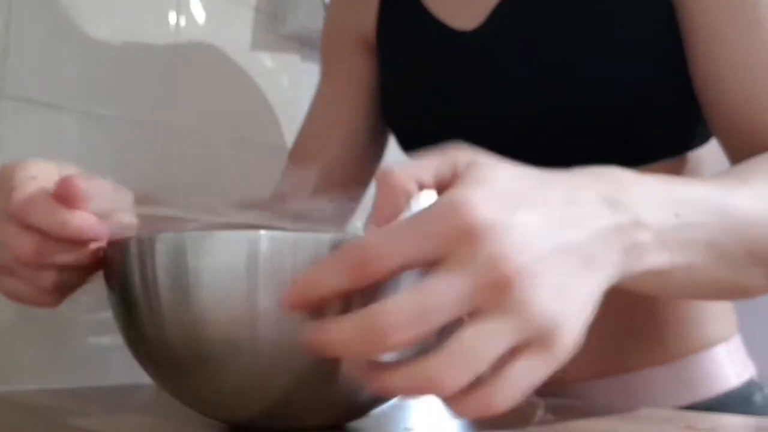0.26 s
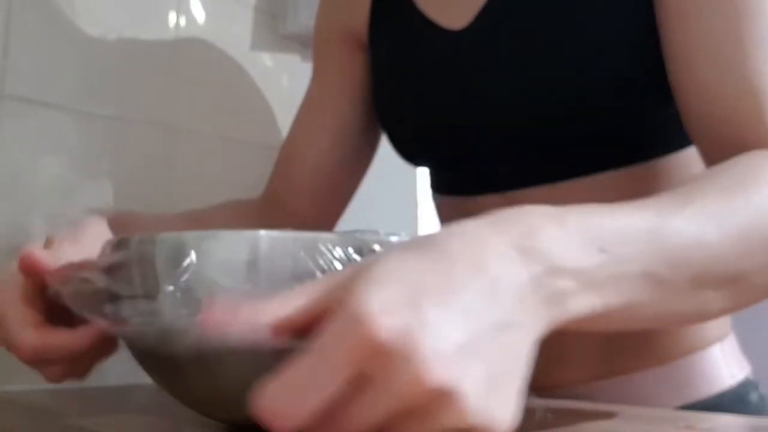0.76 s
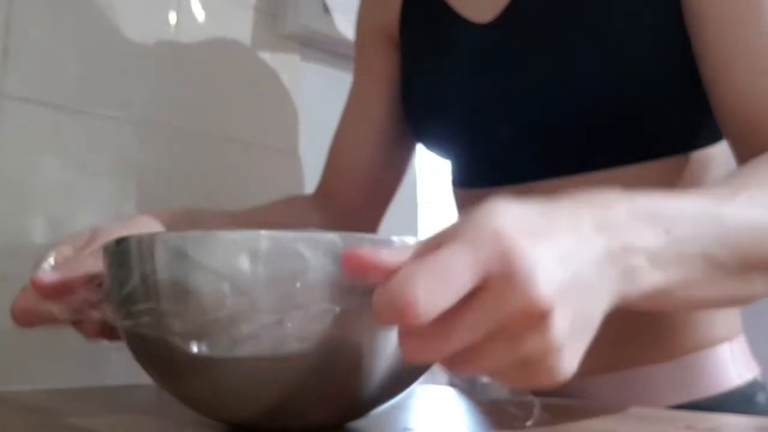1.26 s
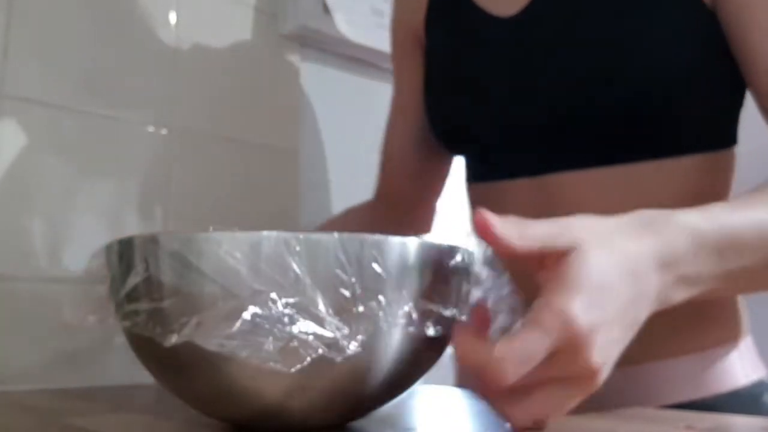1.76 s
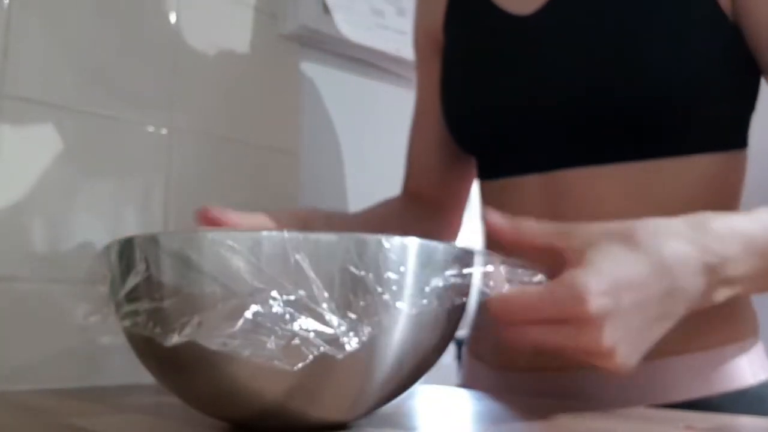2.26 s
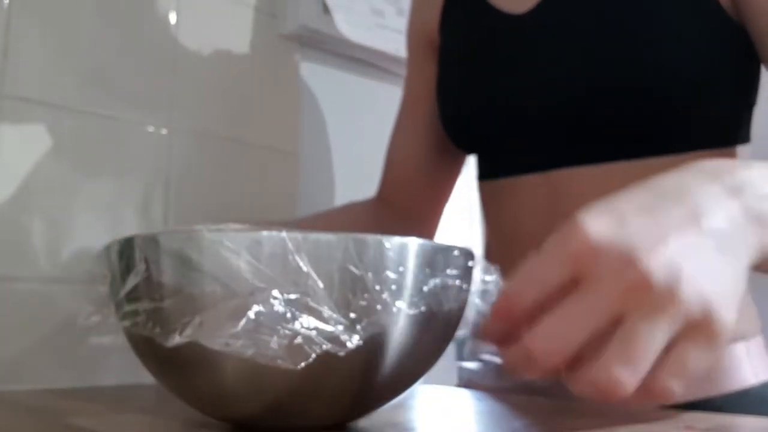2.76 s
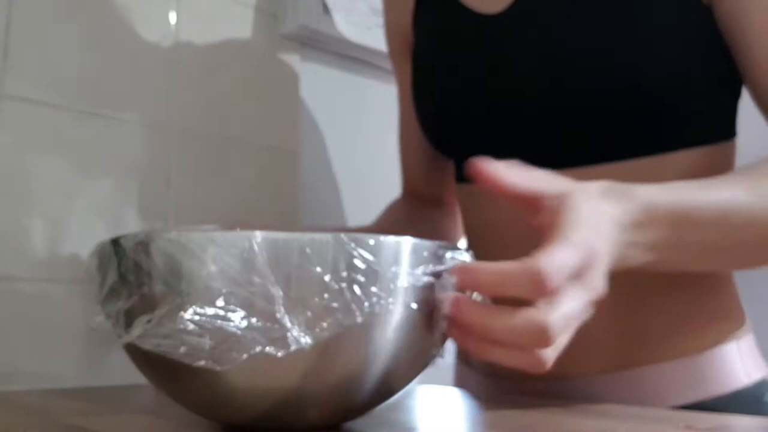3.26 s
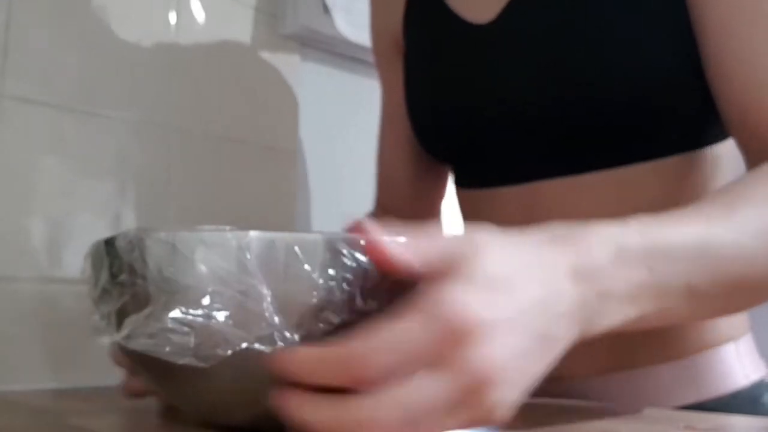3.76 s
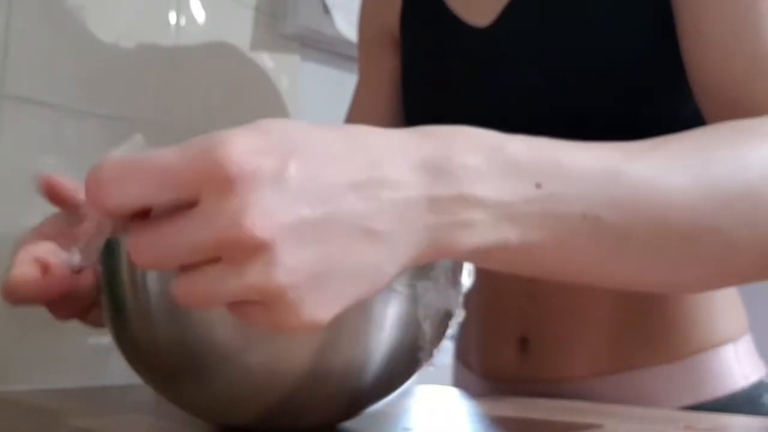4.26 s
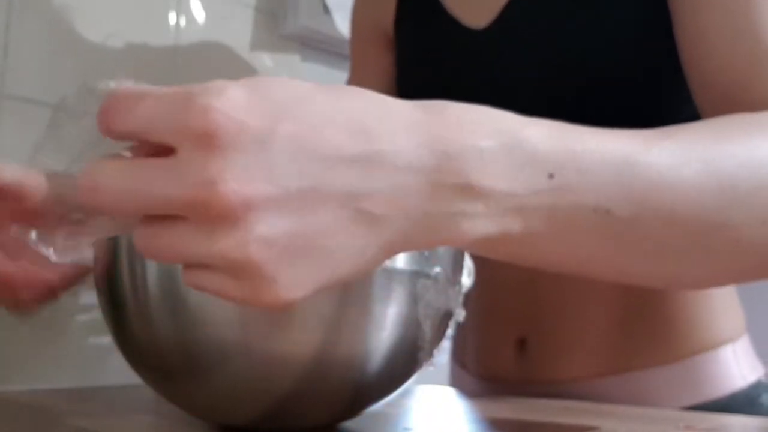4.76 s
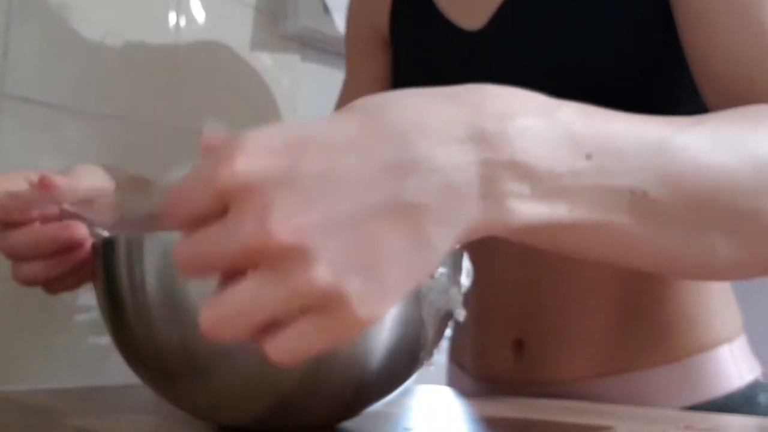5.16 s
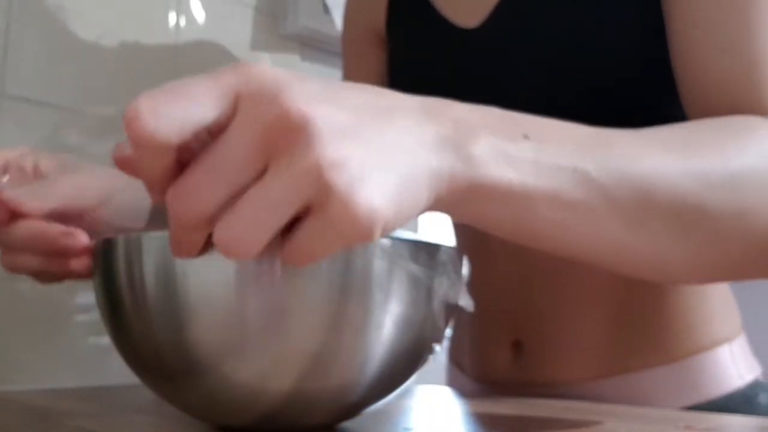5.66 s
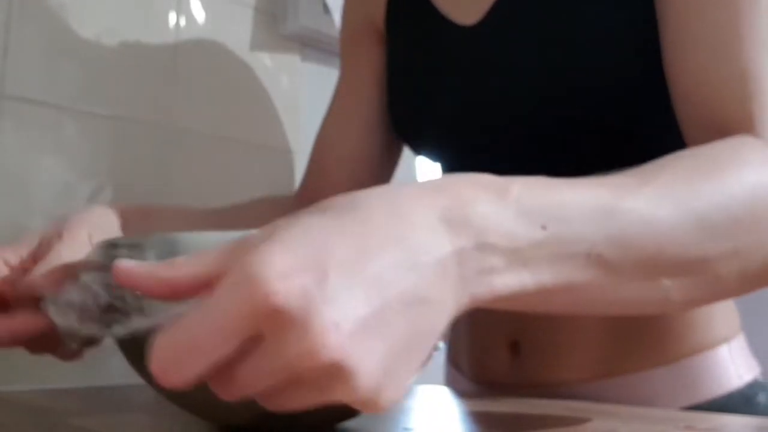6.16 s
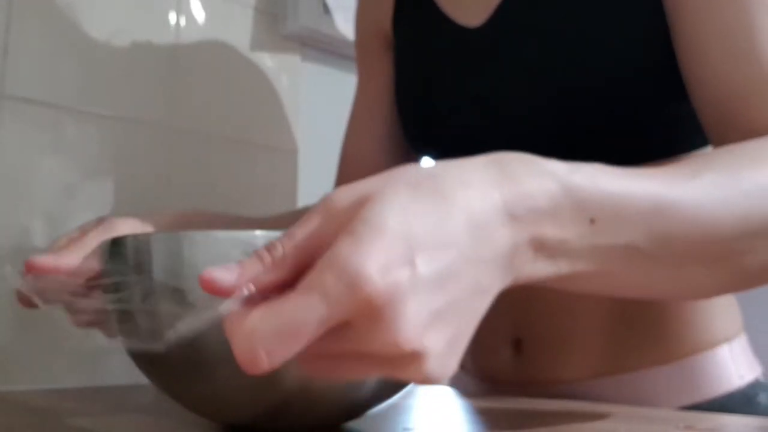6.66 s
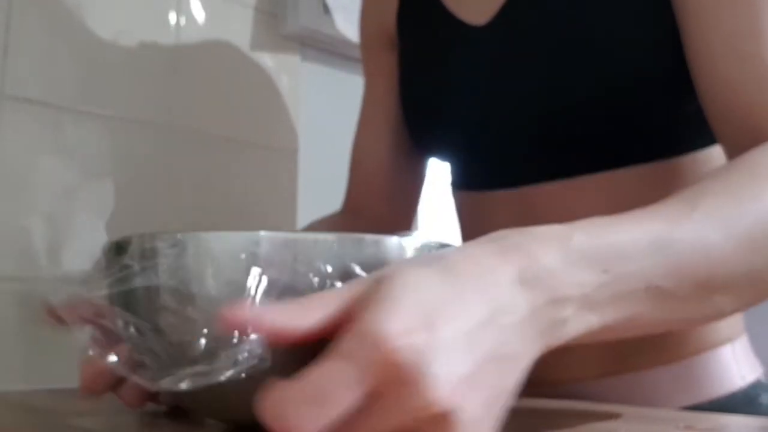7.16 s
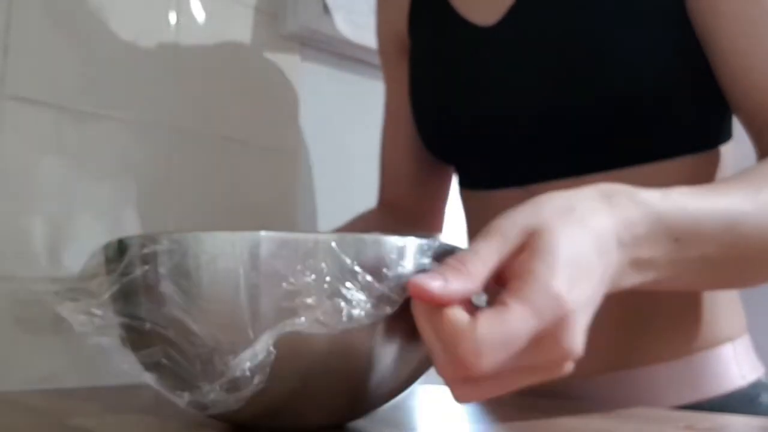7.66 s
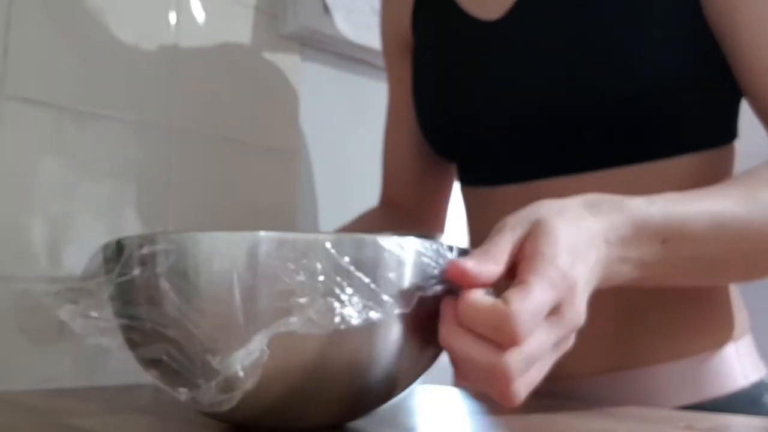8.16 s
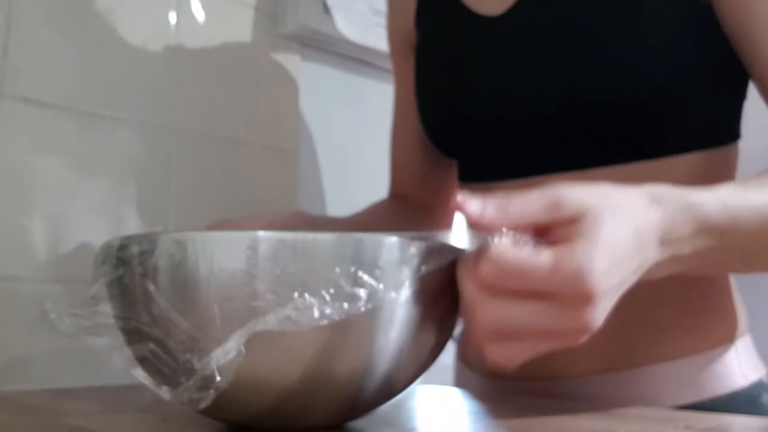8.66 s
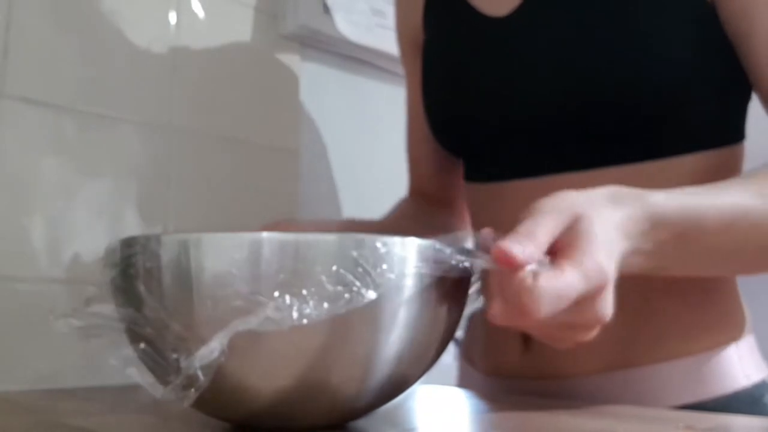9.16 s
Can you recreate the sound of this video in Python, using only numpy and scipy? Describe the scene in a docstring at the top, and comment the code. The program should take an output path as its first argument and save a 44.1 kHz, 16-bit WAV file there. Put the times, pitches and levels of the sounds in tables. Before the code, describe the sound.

Thin plastic wrap crinkles, snaps and rubs taut around a steel bowl that scrapes and bumps, twice banging hard on a kitchen counter.

```python
"""A brief crinkle with a snap in it comes first: cling film pulled over a steel bowl on a kitchen counter.
The film rustles as many tiny buckling clicks, filtered by its facets; its snaps are flurries of slips.
The hands jog and shove the bowl: decaying modes and friction noise give thuds, slides and judder.
Twice it knocks hard on the counter, the second time as a close double blow.
Two nearby microphone ports pick it all up, with the short diffuse tail of a small tiled room."""
import sys
import numpy as np
from scipy import signal
from scipy.fft import rfft, irfft, next_fast_len
from scipy.io import wavfile
from scipy.ndimage import uniform_filter1d

SR = 44100
rng = np.random.default_rng(int(sys.argv[2]) if len(sys.argv) > 2 else 0)


def store_pcm(level_fs):
    """Save levels as 16-bit WAV."""
    pcm = np.round(np.clip(level_fs, -1, 1) * 32767).astype(np.int16)
    wavfile.write(sys.argv[1], SR, np.atleast_2d(pcm).T)


N = 415422

# the bowl is jogged or set down: t/s, level/dB, hardness as spectral tilt/(dB per octave), skid decay/s
BLOWS = [(0.595, -29.5, -8.5, .03), (0.964, -21, -2, .046), (1.558, -15.5, 0.5, 0.014),
         (1.784, -28, -6, 0.014), (1.819, -22, 3, 0.022), (2.976, -37, -8, .02), (3.106, -37, -2, 0.018),
         (3.701, -25.5, -5, 0.08), (3.7891, -1.9, 2.5, 0.012), (4.351, -29, 9, 0.012),
         (4.774, -37, 9.5, .01), (5.131, -25, -3.5, 0.13), (5.646, -25.5, 9, 0.015),
         (5.702, -21, -1.5, 0.072), (6.4471, -2, 2.5, 0.016), (6.4663, -5, 1.5, 0.012),
         (6.794, -33, -0.5, .014), (7.142, -20.5, -2, 0.091), (7.187, -23, -3.5, 0.2),
         (7.7, -38, -4.5, .03), (8.039, -31.5, -9.5, 0.043), (8.121, -42, -5, 0.033),
         (8.204, -31.5, -8.5, 0.07), (8.418, -26, 0.5, .038), (8.834, -25, -3.5, 0.014),
         (9.256, -28.5, -1.5, .017), (9.351, -36, -2, .022)]
# spectral shape of the base skidding on the counter: f/Hz, relative level/dB
SKID_SHAPE = [(35, -53.5), (70, 0), (110, 1.5), (160, -12), (232, -1), (310, -9), (420, -0.5), (520, -14.5),
              (900, -35.5), (1200, -31.5), (2200, -31), (5000, -52.5), (15000, -64)]
# spectral shape of the crinkling film: f/Hz, relative level/dB
CRINKLE_SHAPE = [(300, -40), (1500, -10), (2600, -1.5), (3700, .5), (5000, -3.5), (6500, -5), (8500, -2),
                 (11500, 0), (14300, -2), (16000, -10)]


def amp(db):
    """Level to amplitude: 20 dB is a factor of ten."""
    return 10 ** (np.asarray(db) / 20)


def unit(x):
    """Normalization: the signal is scaled to an rms of one."""
    return x / np.sqrt(np.mean(x ** 2) + 1e-20)


def read(points, hz):
    """Interpolation of a table that is linear in log frequency."""
    f, value = np.transpose(points)
    return np.interp(np.log(hz + 1), np.log(f), value)


def add(mix, s, sound):
    """Superposition: a sound is added to the mix in place from time s."""
    part = mix[..., max(round(s * SR), 0):][..., :sound.shape[-1]]
    part += sound[..., :part.shape[-1]]


def convolve(x, response):
    """Linear filtering by convolution, cut to the length of x."""
    return signal.oaconvolve(np.atleast_2d(x), np.atleast_2d(response), axes=1)[:, :x.shape[-1]]


def causal(gain_db):
    """Minimum phase: the Hilbert transform of log gain (over the whole circle) gives the quickest response."""
    log_gain = np.log(amp(gain_db))
    spectrum = np.exp(np.conj(signal.hilbert(log_gain)))
    return np.fft.ifft(spectrum).real[:len(log_gain) // 2]


def colour(x, points, size=4096):
    """Spectral shaping by a filter of unit energy, which keeps the power of white noise."""
    response = causal(read(points, abs(np.fft.fftfreq(size, 1 / SR))))
    return convolve(x, response / np.linalg.norm(response))


def wander(rate_hz):
    """Slow random modulation: straight lines join normal random knots of unit variance."""
    knots = rng.standard_normal(N // 16)
    return np.interp(np.arange(N) * rate_hz / SR, np.arange(len(knots)), knots)


def room_tone():
    """Stationary background noise: independent shaped noise at the two ports."""
    # spectral shape of the quiet kitchen: f/Hz, relative level/dB
    tone_shape = [(20, -22.5), (50, 4), (95, 1), (150, -6), (400, -53.5), (1000, -18), (3000, -55),
                  (8000, -20), (15000, -33)]
    return amp(-54) * colour(rng.standard_normal((2, N)), tone_shape)


def kitchen(x):
    """Diffuse reverberation: noise taps decay exponentially, each band with its own T60."""
    # reverberation time of the room: f/Hz, T60/s
    decay_times = [(100, 0.26), (400, 0.36), (1500, 0.44), (5000, 0.34), (14000, 0.55)]
    after_gap = np.arange(SR // 2) > .008 * SR  # the tail starts after 8 ms
    taps = rng.standard_normal((2, SR // 2)) * after_gap
    hz, t, z = signal.stft(taps, SR, nperseg=256)
    decay = amp(-60 * t / read(decay_times, hz)[:, None])
    tail = signal.istft(z * decay, SR, nperseg=256)[1]
    return convolve(x, tail / np.linalg.norm(tail[0]))


def ports(film, mono_hz=380):
    """Spatial coherence: at long wavelengths both ports receive nearly the same pressure."""
    length = next_fast_len(N, real=True)
    hz = np.fft.rfftfreq(length, 1 / SR) + 1
    apart = np.pi / 4 / (1 + (mono_hz / hz) ** 2)  # angle between mid only (0) and full stereo
    left, right = rfft(film, length)
    mid = (left + right) * np.cos(apart)
    side = (left - right) * np.sin(apart)
    return irfft([mid + side, mid - side], length)[:, :N] / np.sqrt(2)


def shade(x, size=2048):
    """Interaural-style level difference: opposite half-balance filters colour the two ports."""
    # balance of the ports: f/Hz, left minus right level/dB
    port_balance = [(100, 0), (400, -3), (700, -9), (1200, -2), (2400, -2.5), (4200, 0), (6000, 4),
                    (8200, -.5), (11000, -5), (14500, -2)]
    balance_db = read(port_balance, abs(np.fft.fftfreq(size, 1 / SR))) / 2
    return convolve(x, [causal(balance_db), causal(-balance_db)])


def scatter(near_s, near_db, far_s, far_db, delay=22):
    """Multipath propagation: direct sound, later on the left, then reflections off nearby things and tiles."""
    t = np.arange(SR // 16) / SR
    paths = np.zeros((2, len(t)))
    paths[0, delay] = paths[1, 0] = 1  # delay in samples
    # near: bowl, hands and counter; far: wall tiles
    for decay_s, db in ((near_s, near_db), (far_s, far_db)):
        taps = rng.standard_normal(paths.shape) * np.exp(-t / decay_s)
        paths += amp(db) * taps / np.linalg.norm(taps, axis=1, keepdims=True)
    return paths / np.linalg.norm(paths[0])


def bowl_shuffle(dull_db=-4.5):
    """Sliding friction as noise: taut film drags the bowl in small jerks, and each knock lets it slide on."""
    drag_db = -7  # against the rub of the taut film
    settle_db, settle_per_knock, settle_s = -28, 0.59, 0.08  # level dB, dB per dB of knock, decay s
    t = np.arange(SR // 2) / SR
    power = amp(pull()[1] + drag_db) ** 2
    for s, level_db, _, _ in BLOWS:
        slide = amp(settle_db + settle_per_knock * level_db) * np.exp(-t / settle_s)
        add(power, s, slide ** 2)
    jerks_db = 3 * wander(rate_hz=30)
    drag = rng.standard_normal(N) * np.sqrt(power) * amp(jerks_db)
    # dull_db tilts the shape, per octave from 240 Hz
    dull_shape = [(hz, db + dull_db * np.log2(hz / 240)) for hz, db in SKID_SHAPE]
    return amp(-2.0) * colour(drag, dull_shape)


def judder(rise_s=0.0042):
    """Stick-slip friction, modelled as noise in narrow resonators, sounds as the bowl is shoved."""
    # shoves along the counter: t/s, level/dB, decay/s
    shoves = [(0.785, -38.5, 0.057), (0.965, -23, 0.055), (1.067, -32.5, 0.07), (5.135, -44.5, 0.095),
              (7.245, -41, 0.075)]
    # low resonances of the juddering bowl: f/Hz, bandwidth/Hz, relative level/dB
    resonances = [(128.4, 6.2, 3), (183.7, 7.7, 0.5), (220, 14, -7.5), (277.5, 12, -6.5), (376, 23, -4),
                  (466, 39, -15)]
    out, t = np.zeros(N), np.arange(SR // 2) / SR
    for s, level_db, decay_s in shoves:
        envelope = (1 - np.exp(-t / rise_s)) * np.exp(-t / decay_s)
        slide = 0
        for hz, width, db in resonances:
            b, a = signal.iirpeak(hz, hz / width, fs=SR)
            ring = signal.lfilter(b, a, rng.standard_normal(SR))[-len(t):]  # past the filter's onset
            slide = slide + amp(db) * unit(ring * envelope)
        envelope_rms = np.sqrt(np.mean(envelope ** 2)) / envelope.max()
        add(out, s, amp(level_db) * unit(slide) * envelope_rms)
    return out


def knocks(rise_s=0.0027, soft_db=-1.5, detune=0.0083, ring_db=-5.5, skid_db=-17):
    """Impact excitation of modes, with a skid of the base: a softer blow rises slowly and stays low."""
    # modes of bowl and counter together: f/Hz, relative level/dB, T60/s
    counter_modes = [(84.4, -15, 0.5), (107.4, -1.5, 0.3), (215.6, -5.5, 0.17), (205, -2, 0.04),
                     (241.4, 3.5, 0.12), (268, -15, 0.27), (367.8, -2, 0.13), (411.8, -4.5, 0.15),
                     (441, -2.5, 0.12), (606.5, -18.5, 0.13), (698, -17.5, 0.16), (859, -16.5, 0.12),
                     (871, -24.5, 0.12), (1063, -22, 0.11), (1250, -36, 0.052), (1660, -27.5, 0.13),
                     (1860, -27, 0.044), (2280, -45.5, .06)]
    out, t = np.zeros(N), np.arange(SR // 3) / SR
    hz, db, t60 = np.transpose(counter_modes)[:, :, None]
    skid_hz, skid_level = np.transpose(SKID_SHAPE)
    modes = amp(db - 60 * t / t60)
    for s, level_db, tilt_db, skid_s in BLOWS:
        pitch = hz * (1 + detune * rng.standard_normal(hz.shape))  # the grip shifts the modes
        tilt = amp(tilt_db * np.log2(hz / 240))
        ring = (tilt * modes * np.cos(np.float32(2 * np.pi * pitch * t))).sum(0)
        tilted = skid_level + tilt_db * np.log2(np.maximum(skid_hz, 90) / 240)
        noise = colour(rng.standard_normal(SR // 2), np.transpose([skid_hz, tilted]))
        skid = unit(noise[0, -len(t):]) * np.exp(-t / skid_s)
        ring_rms = np.sqrt(np.mean(ring[:SR // 50] ** 2))  # over the first 20 ms
        blow = amp(ring_db) * ring / ring_rms + amp(skid_db) * skid
        rise = 1 - np.exp(-t / (rise_s * amp(soft_db * tilt_db)))
        add(out, s, amp(level_db) * blow * rise)
    return out


def bowl_ring(film):
    """Forced vibration: film sound convolved with damped modes sets the steel wall ringing."""
    # wall modes, damped by hand and film: f/Hz, relative level/dB, T60/s
    wall_modes = [(880, -3, .06), (1565, -3, .09), (1935, -3, .1), (2190, -5, .22), (2645, -8, .14),
                  (2863, -5, .18), (3168, -4, .18), (3459, -3, .2), (4460, -10, .08)]
    t = np.arange(SR // 3) / SR
    ring = 0
    for hz, db, t60 in wall_modes:
        phase = rng.random((2, 1))  # in cycles, one for each port
        ring = ring + amp(db - 60 * t / t60) * np.sin(2 * np.pi * (hz * t + phase))
    return convolve(film, ring / np.linalg.norm(ring[0]))


def pull(step=64):
    """Power addition: tugs sum to the control levels in dB of loose crinkle and taut rub; rests hush both."""
    # tugs that build and ease: peak t/s, build/s, ease/s, crinkle level/dB, tautness as rub over crinkle/dB
    tugs = [(0.03, 0.039, 0.045, -38, -4), (0.245, 0.066, 0.087, -47.5, 3), (0.43, 0.051, 0.034, -52, 5),
            (0.51, 0.035, 0.053, -51.5, 5.5), (0.68, 0.15, 0.24, -54, -1), (0.82, .016, 0.058, -52, -1),
            (0.895, 0.098, 0.058, -41, 4.5), (1.085, 0.09, 0.25, -50, -22), (1.345, 0.034, .17, -41, 1),
            (1.51, 0.2, 0.06, -47.5, 11.5), (1.68, .08, 0.071, -46.5, 0), (1.82, 0.086, 0.059, -45, 2.5),
            (2.058, 0.056, 0.071, -51, -19), (2.2, 0.09, 0.051, -47, 7), (2.4, 0.27, 0.19, -44, 0.5),
            (2.7, 0.072, 0.17, -50, 4.5), (3.01, 0.11, 0.066, -51, 5.5), (3.145, 0.068, 0.15, -43, -2),
            (3.68, 0.061, 0.11, -38.5, 4), (3.77, 0.038, 0.067, -35.5, -1), (3.925, 0.062, 0.045, -47, 1.5),
            (4.3, 0.15, .14, -40.5, 1), (4.65, 0.076, 0.11, -47, 5), (4.82, 0.18, .14, -46.5, -0.5),
            (5.13, 0.08, .11, -45, -2), (5.33, 0.16, 0.091, -48.5, 0.5), (5.5, 0.081, 0.23, -50, 4),
            (5.655, 0.041, 0.096, -44.5, 10.5), (5.989, 0.019, 0.049, -41.5, 1),
            (6.25, 0.043, 0.037, -44.5, 11.5), (6.47, 0.11, 0.074, -42, 4.5), (6.77, 0.039, .14, -42.5, 0),
            (6.97, 0.088, 0.061, -42.5, 3), (7.068, 0.0099, .025, -27, -4),
            (7.143, 0.018, 0.049, -22.5, -0.5), (7.43, 0.045, .06, -44, 0.5),
            (7.72, 0.13, 0.15, -49.5, -6.5), (7.87, 0.057, 0.054, -46.5, -12), (8.14, 0.019, 0.023, -45, 1),
            (8.45, .24, 0.18, -43.5, 0), (8.635, 0.038, 0.031, -37.5, -4.5),
            (8.72, 0.047, 0.068, -47.5, 11), (8.87, .1, 0.23, -44.5, 2), (9.14, 0.22, 0.13, -47, 3.5),
            (9.41, 0.14, 0.11, -50, 8.5)]
    # the hands stop and the film falls still: middle t/s, length/s
    rests = [(2.635, 0.021), (3.462, 0.036), (3.557, 0.015), (5.065, 0.037), (5.409, .035), (5.891, 0.012),
             (6.1, 0.083), (6.677, 0.12), (7.529, 0.049), (7.806, 0.043), (8.014, 0.091), (8.095, 0.029)]
    drop_db, roundness = 10, 1.38  # drop one build or ease time from the peak; above 1 rounds the peak
    held_crinkle_db, held_rub_db = -57, -59.5  # film that is only held
    rest_depth_db = -10
    t = np.arange(0, N, step) / SR
    peak_s, build_s, ease_s, level_db, taut_db = np.transpose(tugs)[:, :, None]
    away = abs((t - peak_s) / np.where(t < peak_s, build_s, ease_s))
    tug_db = level_db - drop_db * away ** roundness
    crinkle = (amp(tug_db) ** 2).sum(0) + amp(held_crinkle_db) ** 2
    rub = (amp(tug_db + taut_db) ** 2).sum(0) + amp(held_rub_db) ** 2
    rest_db = rest_depth_db * sum(np.exp(-(2 * (t - s) / length) ** 2) for s, length in rests)
    levels = [10 * np.log10(power) + rest_db for power in (crinkle, rub)]
    return [np.interp(np.arange(N) / SR, t, level) for level in levels]


def ticks():
    """Random point process: small snaps at chance moments follow the pull; rows of t/s, crack/dB, pop/dB."""
    ticks_per_s, over_rustle_db, spread_db = 8.4, -1.5, 5.5
    crinkle_db, rub_db = pull()
    when, strength = rng.random((N // 1024, 2))[:int(ticks_per_s * N / SR)].T
    at = (when * N).astype(int)
    over_db = over_rustle_db + spread_db * (2 * strength - 1)
    return list(zip(at / SR, crinkle_db[at] + over_db, rub_db[at] + over_db - 3.5))


def snaps(slip_s=0.0017, slip_db=-16, evenness=0.64, thin_hz=520, size=64):
    """Sudden release of tension: one slip and a flurry of smaller ones give a bright crack and a hollow pop."""
    # the film lets go of the rim: t/s, crack level/dB, level of the taut sheet's pop/dB
    releases = [(0.0262, -33.5, -43.5), (0.5017, -40.5, -37), (0.804, -37, -51), (0.966, -37.5, -45),
                (0.9854, -32.5, -47), (1.0896, -35.5, -37.5), (1.3332, -37.5, -37.5), (1.412, -46, -39),
                (1.472, -33, -51), (1.4798, -21.5, -22), (2.337, -52, -43), (4.307, -32.5, -42),
                (4.352, -48, -38.5), (4.2595, -36.5, -52), (4.637, -38.5, -55), (4.776, -45, -33.5),
                (5.272, -49, -42), (5.638, -42, -36.5), (5.696, -35, -27.5), (5.754, -39.5, -40.5),
                (5.799, -44, -40), (5.913, -42, -38.5), (5.9752, -39, -38.5), (6.2412, -38.5, -38),
                (6.372, -44, -32), (6.43, -32.5, -31), (6.5225, -35.5, -34.5), (6.846, -23.5, -21.5),
                (6.971, -37, -32.5), (7.058, -45, -26), (7.0662, -27, -13), (7.1202, -21, -20.5),
                (7.1365, -32, -17), (7.147, -31, -18), (7.1898, -44, -27), (7.2457, -27, -28.5),
                (7.3377, -47, -39), (7.4146, -51, -40), (8.247, -41, -45), (8.4616, -32, -35.5),
                (8.72, -31, -23.5), (9.028, -39.5, -29), (9.074, -28, -30), (9.3956, -44, -34)]
    # spectral shape of the pop: f/Hz, relative level/dB
    pop_shape = [(60, -47.5), (250, 1), (500, -5.5), (700, 0.5), (900, 0.5), (1200, -4), (1900, -4.5),
                 (3200, -6), (5000, -13.5), (9000, -29.5), (15000, -33.5)]
    out, t = np.zeros((2, N)), np.arange(SR // 16) / SR
    for s, crack_db, pop_db in releases + ticks():
        slips = rng.standard_normal(len(t)) * (rng.random(len(t)) < .2)
        flurry = amp(slip_db) * slips * np.exp(-t / slip_s)
        flurry[0] = 1
        spectrum = rfft(convolve(flurry, scatter(near_s=0.0021, near_db=1, far_s=0.0069, far_db=8.5)))
        # so brief a release is broadband: no region of the spectrum stands far out
        smooth = uniform_filter1d(abs(spectrum), size // 2, axis=1)
        burst = irfft(spectrum / smooth ** evenness, len(t))
        for level_db, shape in ((crack_db, CRINKLE_SHAPE), (pop_db, pop_shape)):
            part = colour(burst, shape)
            early_rms = np.sqrt(np.mean(part[:, :SR // 100] ** 2))  # over the first 10 ms
            add(out, s, amp(level_db) * part / early_rms)
    thin = signal.butter(2, thin_hz, "high", fs=SR, output="sos")  # so light a sheet moves little air
    return signal.sosfilt(thin, out)


def buckles(per_s, spread_db, low_hz, high_hz, facet_db, shift_db, count=6, size=512, block=20480):
    """Buckling as random impulses of unequal size: each facet has its own pitch, and strain moves among them."""
    out = np.zeros((2, N))
    hz = abs(np.fft.fftfreq(size, 1 / SR)) + 1
    length = next_fast_len(block + SR // 16 + size, real=True)
    for facet_hz in np.geomspace(low_hz, high_hz, count):
        when, strength, sign = rng.random((N // 32, 3))[:int(per_s * N / SR / count)].T
        strain = rng.standard_normal(N // 2048)
        strain_db = shift_db * np.interp(when * len(strain), np.arange(len(strain)), strain)
        level_db = spread_db * np.minimum(-np.log(strength), 4) + strain_db
        clicks = np.bincount((when * N).astype(int), amp(level_db) * np.sign(sign - .5), N)
        octaves = np.log2(hz / facet_hz)
        facet = rfft(causal(facet_db * np.exp(-(2 * octaves) ** 2)), length)
        for start in range(0, N, block):  # the folds move, so their paths to the ports keep changing
            paths = scatter(near_s=0.0017, near_db=5.0, far_s=0.014, far_db=4.5)
            paths = rfft(np.float32(paths), length)
            spectrum = rfft(clicks[start:start + block], length) * facet * paths
            add(out, start / SR, irfft(np.complex64(spectrum), length))
    return out


def rustle(fizz_hz=7000):
    """Tension sets fold size: slack film fizzes finely, taut film is coarser and rubs, in shared clumps."""
    # spectral shape of the rub: f/Hz, relative level/dB
    rub_shape = [(60, -9.5), (200, -18), (350, 0), (500, -3.5), (750, 1), (1100, -5.5), (1600, -4),
                 (2400, -9), (3600, -12.5), (6000, -37), (15000, -41)]
    fizz_db, fizz_per_taut = -0.5, -.4  # fineness: offset dB, dB per dB of tautness
    crinkle_db, rub_db = pull()
    clumps_db = 2.23 * wander(rate_hz=90) + .5 * wander(rate_hz=16)
    loose = buckles(per_s=3600, spread_db=-0.5, low_hz=1700, high_hz=13300, facet_db=4.5, shift_db=2.5)
    crinkle = unit(colour(loose, CRINKLE_SHAPE))
    fizz = signal.sosfilt(signal.butter(1, fizz_hz, "high", fs=SR, output="sos"), crinkle)
    fine_db = fizz_db + fizz_per_taut * (rub_db - crinkle_db)
    crinkle = fizz * amp(.15 * fine_db) + (crinkle - fizz) * amp(-1.1 * fine_db)
    taut = buckles(per_s=1600, spread_db=3.0, low_hz=364, high_hz=3440, facet_db=12, shift_db=2.5)
    rub = unit(colour(taut, rub_shape))
    return crinkle * amp(crinkle_db + clumps_db + 0.5) + rub * amp(rub_db + clumps_db - 4.0)


def scene():
    """Superposition of film, bowl, room and the quiet of the kitchen at the two ports."""
    film = rustle() + snaps()
    film = film + amp(-19.5) * bowl_ring(film)
    thuds = knocks() + judder() + bowl_shuffle()
    boom = amp(-16) * kitchen(thuds)
    airborne = ports(film + amp(-14.5) * kitchen(film) + room_tone())
    return shade(airborne + thuds + boom)


def record(dry, bass_hz=50, cut_off_hz=14680):
    """Band limiting and clipping: deep bass is shed, full scale bounds the peaks, then the treble is cut off."""
    high_pass = signal.butter(2, bass_hz, "high", fs=SR, output="sos")
    bounded = np.clip(signal.sosfilt(high_pass, dry), -1, 1)
    low_pass = signal.firwin(401, cut_off_hz, window=("kaiser", 8), fs=SR)
    return signal.oaconvolve(bounded, low_pass[None], "same", axes=1)


dry = scene()
out = record(dry)
store_pcm(out)
```